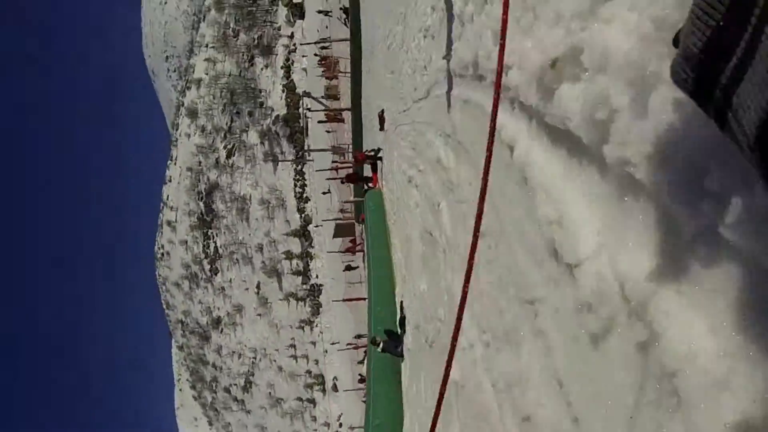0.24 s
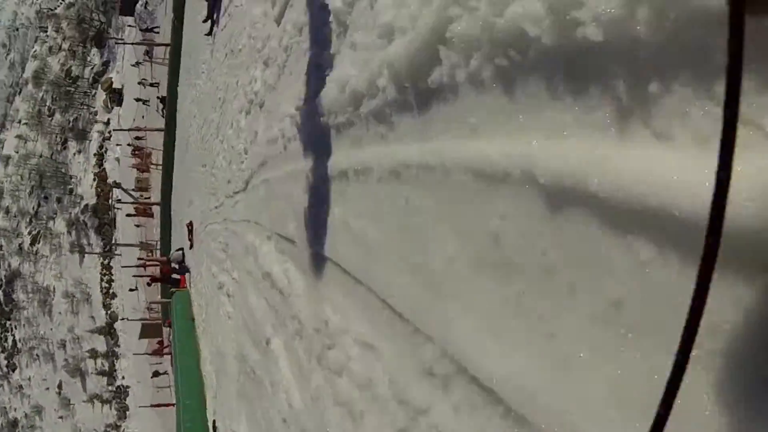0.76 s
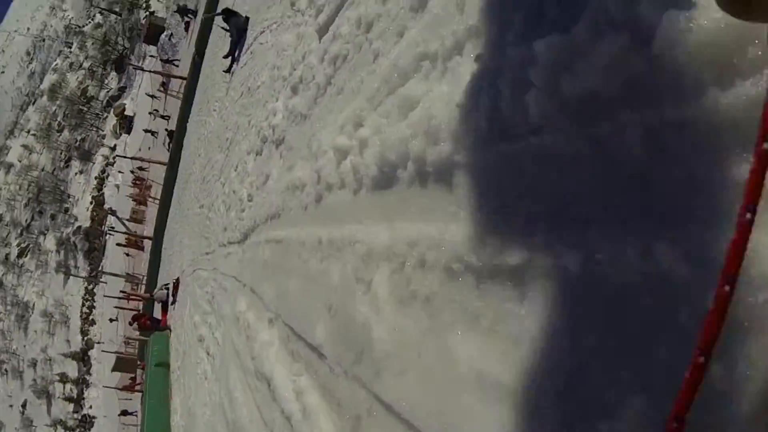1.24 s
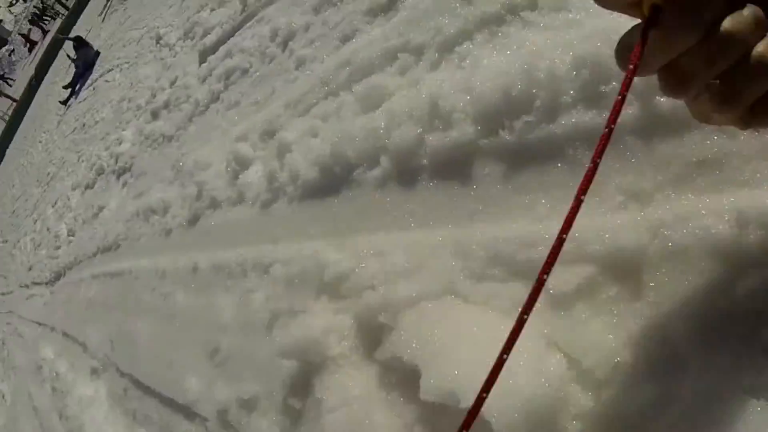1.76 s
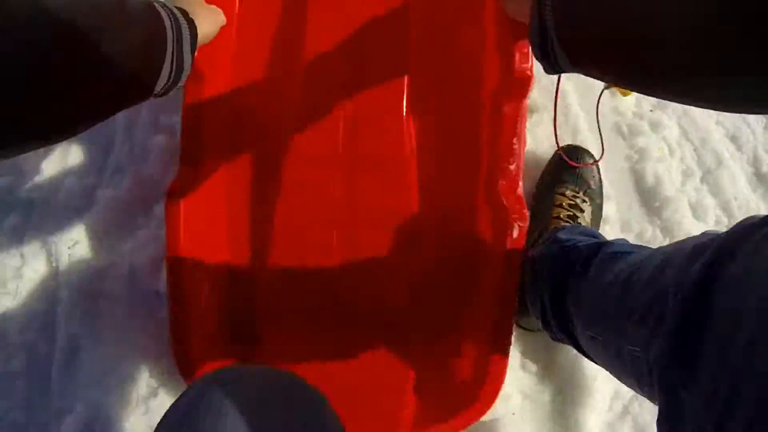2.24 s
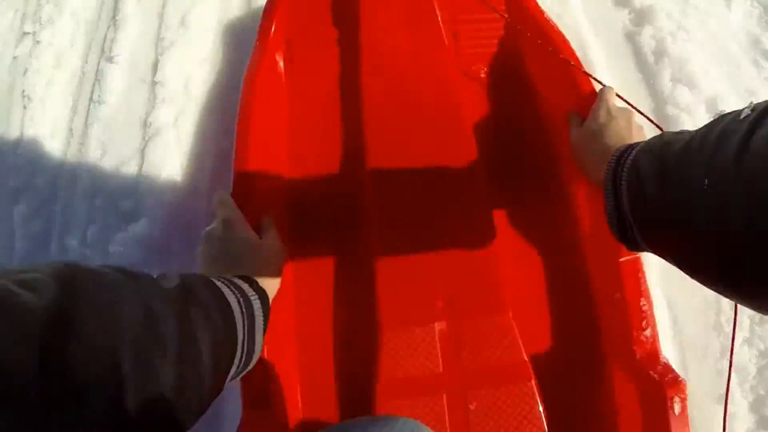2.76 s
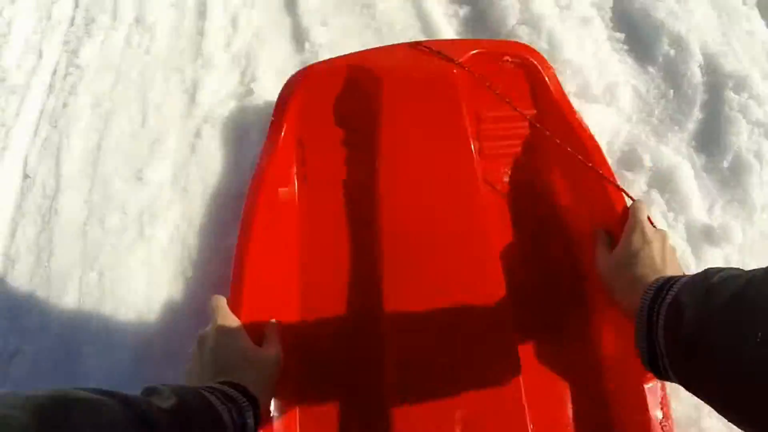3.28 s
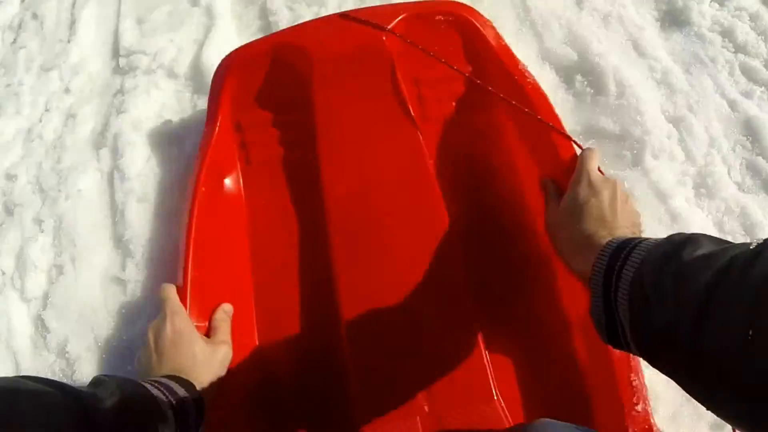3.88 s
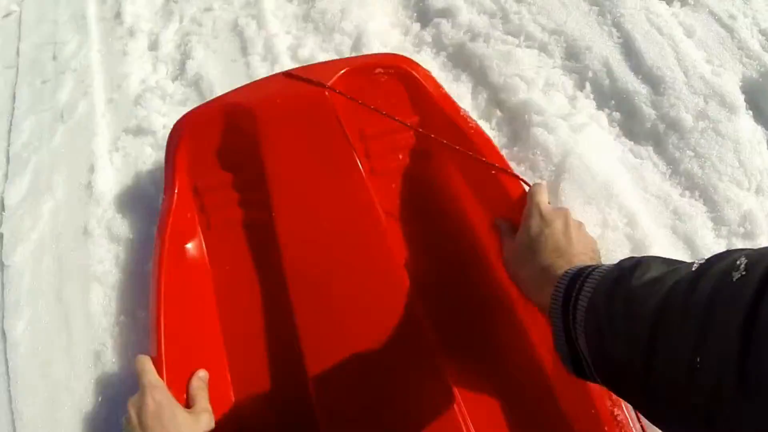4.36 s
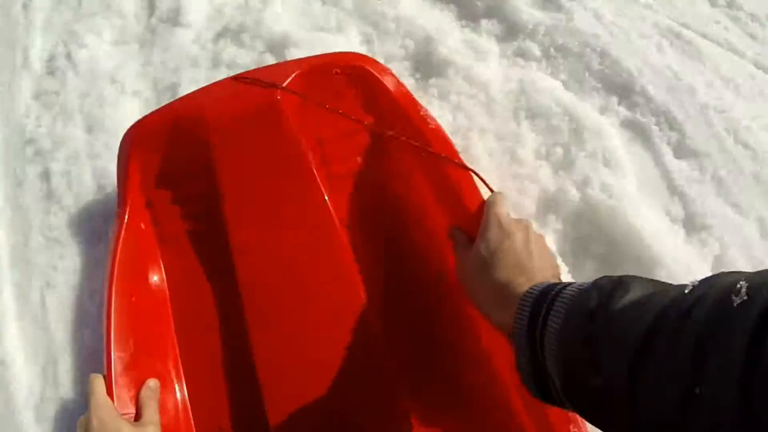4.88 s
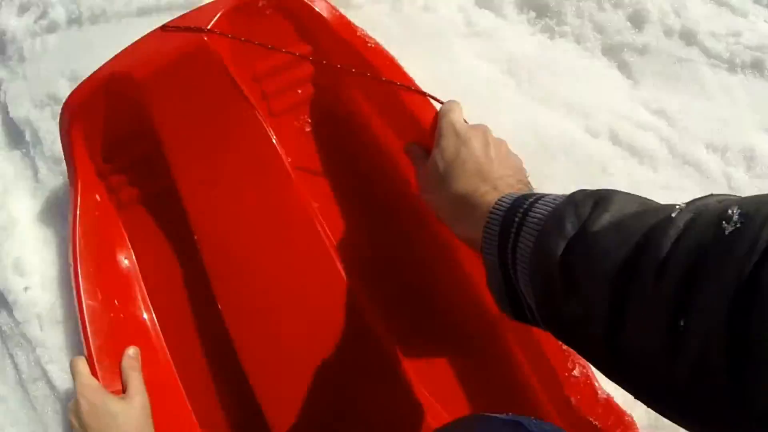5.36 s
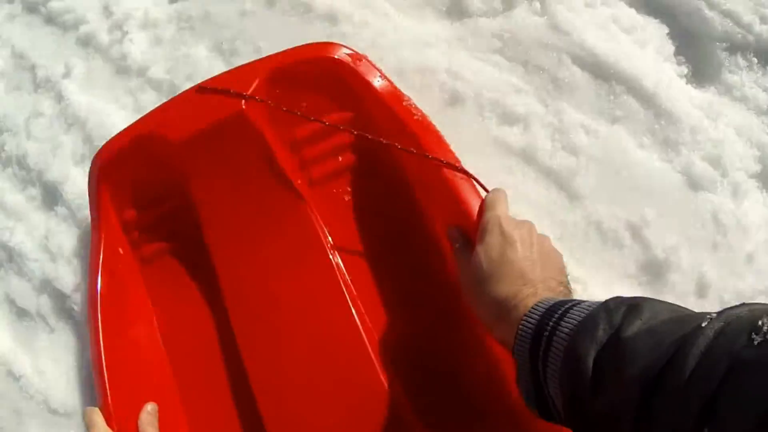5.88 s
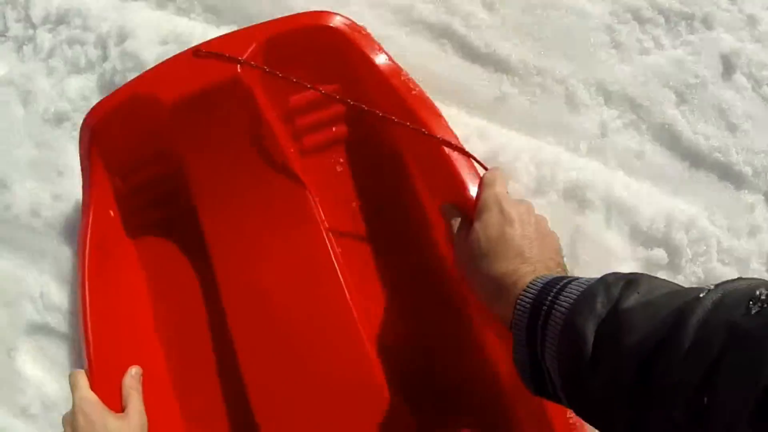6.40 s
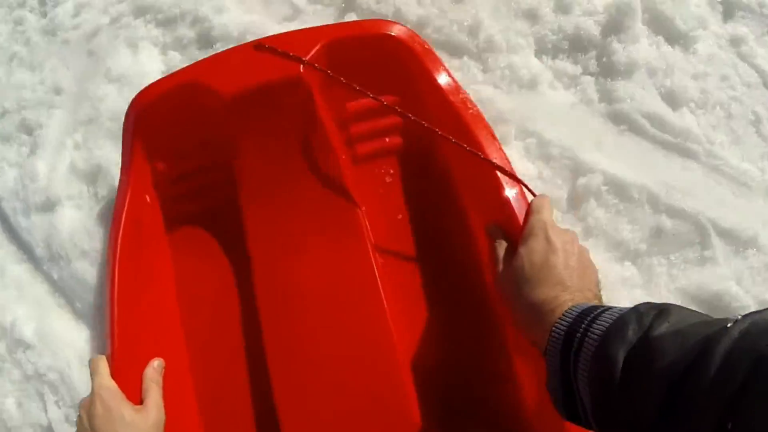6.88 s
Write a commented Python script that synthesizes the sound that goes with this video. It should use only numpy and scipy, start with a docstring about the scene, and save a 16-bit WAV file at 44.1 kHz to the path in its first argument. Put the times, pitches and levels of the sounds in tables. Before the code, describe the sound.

Close, boxy plastic cracks and short rough rubs crowd together over low wind thumps and snow hiss as a sled bumps downhill.

```python
"""A plastic sled runs down a snowy slope, heard by a small camera in a closed plastic housing.
It opens on scraping under a short burst of hiss; then come scattered, mostly hard knocks on a brighter shell.
At 2.33 s the camera turns, the shell dulls, and knocks and rough rubs crowd in until about 5.8 s, then thin out.
Knocks are decaying modes, scrapes are stick-slip taps through those modes, wind is filtered noise, bumps are
low swings. The loudest knocks overload the input, which falls silent briefly near 1.3, 2.3 and 3.3 s."""
import sys
import numpy as np
from scipy import signal
from scipy.fft import rfft, irfft, next_fast_len
from scipy.io import wavfile
from scipy.ndimage import uniform_filter1d

SR = 44100
rng = np.random.default_rng(int(sys.argv[2]) if len(sys.argv) > 2 else 0)


def bounce(signal):
    """Save signal as a 16-bit WAV file at the path given by the first command-line argument."""
    frames = np.transpose(np.atleast_2d(signal))
    limited = np.clip(frames, -1, 1)
    pcm = np.round(limited * 32767).astype(np.int16)
    wavfile.write(sys.argv[1], SR, pcm)


N = 314854
RING_SAMPLES = 4096


def undb(db):
    """Decibels to gain."""
    return 10 ** (np.asarray(db) / 20)


def unit(x):
    """Scale to rms 1."""
    return x / np.sqrt(np.mean(x ** 2))


def curve(table):
    """Columns of a table as sample-by-sample controls."""
    time_s, *columns = np.transpose(table)
    return [np.interp(np.arange(N) / SR, time_s, column) for column in columns]


def colour(x, points):
    """Filter by (frequency [Hz], gain [dB]) points, interpolated over log frequency."""
    size = next_fast_len(N)
    hz, db = np.transpose(points)
    bin_hz = np.arange(size // 2 + 1) * SR / size
    gain = undb(np.interp(np.log(bin_hz + 1), np.log(hz), db))
    return irfft(rfft(x, size) * gain, size)[:N]


def walk(rate_hz):
    """Random levels held 1 / rate_hz s and slewed twice."""
    hold = int(SR / rate_hz)
    steps = np.repeat(rng.standard_normal(N // hold + 1), hold)
    return uniform_filter1d(uniform_filter1d(steps, hold), hold)[:N]


# wind and snow past the port, before flutter: (time [s], thump level [dB], rush level [dB])
WIND_LEVELS = [(0, -37.5, -62.5), (.42, -30, -61.5), (.55, -20.5, -59.5), (.92, -24.5, -54.5),
               (1.05, -32.5, -61.5), (1.8, -41.5, -66), (2.38, -30.5, -56), (2.6, -27.5, -44.5),
               (2.84, -29.5, -55.5), (3.78, -41, -54), (4.2, -31.5, -53.5), (4.61, -36, -53.5),
               (5.89, -31.5, -52), (6.5, -21.5, -39.5), (6.7, -25.5, -50.5), (6.88, -28.5, -46.5),
               (7.14, -25.5, -43)]
# relative noise spectra: (frequency [Hz], density [dB per Hz])
THUMP_SPECTRUM = [(15, 3), (28, 3), (60, -11.5), (130, -26), (250, -46.5), (500, -86.5)]
RUSH_SPECTRUM = [(80, 0), (170, -1), (320, -1), (700, -8), (1200, -17), (2500, -54.5)]
HISS_SPECTRUM = [(1500, -2.5), (3000, -5.5), (6500, -8.5), (9000, -19.5), (11000, -18.5), (15000, -31)]
HISS_OVER_RUSH_DB = -5
BURST_DB, BURST_S = -42, 0.069  # extra hiss at the start


def wind():
    """Slow pressure swings thump on the port, snow rushes under the hull, spray hisses far above in pitch."""
    thump_db, rush_db = curve(WIND_LEVELS)
    t = np.arange(N) / SR
    burst = undb(BURST_DB) * np.clip(2 - 2 * t / BURST_S, 0, 1)
    hiss_gain = undb(rush_db + HISS_OVER_RUSH_DB) + burst
    thump = unit(colour(rng.standard_normal(N), THUMP_SPECTRUM)) * undb(2 * walk(16))
    rush = unit(colour(rng.standard_normal(N), RUSH_SPECTRUM)) * undb(4.6 * walk(25))
    hiss = unit(colour(rng.standard_normal(N), HISS_SPECTRUM)) * undb(4.0 * walk(25))
    return undb(thump_db) * thump + undb(rush_db) * rush + hiss_gain * hiss


# low bumps of the hull: (time [s], level before decay [dB], frequency [Hz])
HULL_BUMPS = [(2.09, -28, 90), (2.332, -29, 110), (2.531, -28, 100), (2.607, -21.5, 92), (6.844, -23, 98)]


def bumps():
    """The loaded hull flexes: one heavy swing that dies within a cycle or two."""
    t = np.arange(N) / SR
    out = np.zeros(N)
    for start_s, db, hz in HULL_BUMPS:
        age_s = np.maximum(t - start_s, 0)
        out += undb(db) * np.sin(2 * np.pi * hz * age_s) * np.exp(-age_s * hz)
    return out


def ring(modes, detune, scatter_db, count):
    """count responses of a mode group to a tap, peak 1; neighbouring modes start in opposite senses."""
    hz, db, t60_s = np.transpose(modes)[:, None, :, None]
    chance = rng.standard_normal((count, len(modes), 2))
    t = np.arange(RING_SAMPLES) / SR
    sense = (-1.) ** np.arange(len(modes))[:, None]
    mode_hz = hz * (1 + detune * chance[..., :1])
    waves = np.exp(-np.log(1000) * t / t60_s) * np.sin(2 * np.pi * mode_hz * t)
    mode_gain = undb(db + scatter_db * chance[..., 1:])
    out = (sense * mode_gain * waves).sum(axis=1)
    return out / abs(out).max(axis=1, keepdims=True)


def slips(rate_hz, spread_db, flurry_db):
    """Stick-slip taps of very uneven size over a fine grain; they come in quick flurries."""
    fall, size = rng.random((N, 2)).T
    taps = (fall < rate_hz / SR) * undb(-spread_db * np.log(1 - size)) * rng.standard_normal(N)
    grain = 0.74 * rng.standard_normal(N)
    flurries = (unit(taps) + grain) * undb(flurry_db * walk(110))
    # slips are softer than blows and lose the extreme treble
    return unit(colour(flurries, [(3000, -3.5), (12000, -10.5)]))


RUB_SWELL_DB = 11  # ends of a rub below its middle


def rub(start_s, end_s):
    """Envelope of one rub: quick edges and a swell in the middle."""
    t = np.arange(N) / SR
    place = np.clip((2 * t - start_s - end_s) / (end_s - start_s), -1, 1)
    gate = uniform_filter1d(1. * (abs(place) < 1), size=200)
    return gate * undb(-RUB_SWELL_DB * place ** 2)


# housing modes, also rung by knocks(): (frequency [Hz], relative level [dB], t60 [s])
DEEP_MODES = [(722, -7, 0.029), (997, 1.5, 0.013)]
LOW_MODES = [(1274.4, 2, 0.015), (1611, 3, 0.0084), (1429, -7, 0.016)]
MIDDLE_MODES = [(2143, 2.5, 0.014), (3100, -12.5, 0.023), (3346, -8, 0.017)]
HIGH_MODES = [(3625, 2.5, 0.011), (4106, -11.5, 0.028), (4614, 4, 0.016), (5760, -12, 0.012),
              (6730, -2.5, 0.0037), (10040, -47.5, 0.0027), (13000, -53.5, 0.0024)]
# until the camera is turned to face the sled the shell is held differently: middle modes sit higher
MIDDLE_MODES_BEFORE = [(2406, 4, 0.0049), (3060, 0.5, 0.0087), (3274, -1.5, 0.0072), (3840, -44.5, 0.17)]
TURN_S = 2.33
# steady sliding: (time [s], level [dB])
SLIDE_LEVELS = [(0, -40), (.15, -58.5), (.95, -55.5), (1.05, -63), (1.8, -68.5), (2.1, -62.5),
                (2.75, -45.5), (2.9, -55), (3.27, -48), (3.65, -57.5), (4.05, -54.5), (4.34, -47.5),
                (4.6, -57), (4.85, -49.5), (5.9, -50), (6.42, -38.5), (6.9, -46.5), (7.14, -36.5)]
# short rough rubs: (start [s], end [s], mid-rub level [dB], middle ring minus low [dB])
ROUGH_RUBS = [(0, 0.093, -37.5, -12.5), (0.999, 1.017, -30.5, -5.5), (1.872, 2.056, -34, -1.5),
              (2.225, 2.249, -39, -22), (2.573, 2.599, -32, -16), (2.692, 2.753, -32, -7),
              (3.083, 3.14, -27, -7.5), (3.202, 3.249, -31.5, -13.5), (3.267, 3.322, -38.5, -25),
              (3.722, 3.781, -28, -13.5), (3.837, 3.954, -40, -19), (4.083, 4.118, -35.5, -29),
              (4.207, 4.268, -26.5, -15), (4.296, 4.376, -37, -15), (4.5, 4.522, -25.5, -13),
              (4.762, 4.818, -35, -11), (4.98, 5.033, -29, -15), (5.119, 5.172, -24.5, -15),
              (5.306, 5.332, -35.5, -26), (5.545, 5.584, -29.5, -17.5), (5.721, 5.788, -28.5, -15.5),
              (6.039, 6.083, -30.5, -22)]
# steady sliding, drive of middle and high rings relative to low
BRIGHT_BEFORE_DB, BRIGHT_AFTER_DB = -7.5, -12


def scrape():
    """Steady sliding and short rubs ring the same shell as the knocks."""
    slide_db, = curve(SLIDE_LEVELS)
    t = np.arange(N) / SR
    before = t < TURN_S
    bright_db = np.where(before, BRIGHT_BEFORE_DB, BRIGHT_AFTER_DB)
    steady = slips(2500, spread_db=2.5, flurry_db=3)
    rough = slips(2200, spread_db=2.5, flurry_db=4.5)
    rub_push, rub_bright = np.zeros(N), np.zeros(N)
    for start_s, end_s, db, hard_db in ROUGH_RUBS:
        envelope = rub(start_s, end_s)
        rub_push += envelope * undb(db)
        rub_bright += envelope * undb(db + hard_db)
    push = undb(slide_db) * steady + rough * rub_push
    bright = undb(slide_db + bright_db) * steady + rough * rub_bright

    def through(force, modes):
        """A force heard through one mode group, response scaled to unit energy."""
        shape = ring(modes, detune=0, scatter_db=0, count=1)[0]
        return signal.fftconvolve(force, shape / np.linalg.norm(shape))[:N]

    middle = np.where(before, through(bright, MIDDLE_MODES_BEFORE), through(bright, MIDDLE_MODES))
    low = through(push, LOW_MODES) + undb(-17.5) * through(push, DEEP_MODES)
    return low - middle - undb(-11) * through(bright, HIGH_MODES)


RATTLE_PER_S = 35  # count rounded up in each rub
RATTLE_OVER_RUB_DB, RATTLE_SPREAD_DB = 9, 4  # spread is plus or minus


def rattle():
    """Light knocks at random times within each rub, as rows like BLOWS."""
    rows = []
    for start_s, end_s, db, hard_db in ROUGH_RUBS:
        length_s = end_s - start_s
        when, size = rng.random((int(np.ceil(RATTLE_PER_S * length_s)), 2)).T
        level_db = db + RATTLE_OVER_RUB_DB + RATTLE_SPREAD_DB * (2 * size - 1)
        rows += zip(start_s + when * length_s, level_db, hard_db + 0 * size)
    return rows


# blows: (time [s], low ring peak before contact shaping [dB], hardness as middle ring minus low [dB])
BLOWS = [(0.049, -24, 3), (0.0897, -39.5, 20), (0.583, -16.5, -22), (0.984, -2, 2.5), (1.1501, 0.5, 2),
         (1.3994, -34, -28.5), (1.4951, -0.5, 3), (1.6682, -2, 4.5), (1.7884, -18, 11), (1.8012, -23.5, 6),
         (1.8515, -25, 6), (1.8618, -25.5, 5), (1.921, -19, 7.5), (2.092, -36, -5), (2.111, -33, -14),
         (2.1635, -22.5, -11), (2.1752, -13.5, 5.5), (2.319, -27.5, -11), (2.3301, -24, -11),
         (2.5213, -5.5, -3.5), (2.558, -1.5, -13), (2.6182, 4.5, -15), (2.65, -1, -15.5),
         (2.7018, -12, -0.5), (2.712, -10, -1), (2.7236, -8.5, -8), (2.757, -10.5, -15),
         (2.7617, -6.5, -3.5), (2.776, -11, -17), (2.858, 0, -2), (2.9276, -3.5, -2.5), (2.944, -16.5, -9),
         (3.0905, -17, -17), (3.102, -13, -5), (3.118, -16.5, 1), (3.1308, -7.5, -21), (3.1457, -19.5, -14),
         (3.2, -3, -2.5), (3.2089, -10, -17), (3.378, -4, -4), (3.3829, -8.5, -8), (3.3876, -8, -1.5),
         (3.4038, -7.5, -4), (3.4342, -5, -7.5), (3.4621, -3.5, -3.5), (3.4875, -18.5, -11),
         (3.53, -3, -2.5), (3.5374, -7, -3.5), (3.706, -11.5, -5.5), (3.7323, -2, -9), (3.7689, -12, -6.5),
         (3.772, -13, -26), (3.7933, -15, -12.5), (3.803, -18, -15), (3.8465, -17.5, -9.5),
         (3.858, -16.5, -14), (3.89, -17.5, -20), (3.9462, -12.5, -13), (4.0897, -16, -17),
         (4.137, -12.5, -7), (4.1599, -11, -16), (4.1653, -11, 7.5), (4.184, -5, -10), (4.198, -17, -17),
         (4.2154, -4.5, -8.5), (4.2211, -5, -8.5), (4.2353, -9, -11.5), (4.2464, -14, -13),
         (4.2894, -3, -5.5), (4.31, -13, -7.5), (4.322, -9, -14), (4.348, -13.5, -6.5),
         (4.3645, -9.5, -11.5), (4.4586, -19, -11), (4.5014, -1, -9.5), (4.5531, -7.5, -1.5),
         (4.5697, -4, -4), (4.6371, -4.5, -2.5), (4.744, -21, -15), (4.78, -14, -5), (4.7993, -4, -8.5),
         (4.8112, -8.5, -11), (4.8486, -8.5, -14.5), (4.857, -12.5, -18), (4.903, -23, -4),
         (4.9333, -13, 4), (4.952, -2.5, -7), (4.9572, -3, -10), (4.981, -8, -9.5), (4.9916, -4, -10.5),
         (5.02, -11.5, -13.5), (5.0265, -9.5, -16), (5.056, -12, -7), (5.0842, -11.5, -3.5),
         (5.1051, -16, -8), (5.12, -18, -14), (5.126, -15, -10), (5.137, -15, -7), (5.145, -12.5, -5.5),
         (5.1844, -11.5, -17), (5.209, -23, -21), (5.3554, -3.5, -7), (5.5184, -10, -10), (5.525, -14, -16),
         (5.5467, -14.5, -20), (5.5533, -13, -27), (5.5808, -7, -7.5), (5.6142, -16.5, -14),
         (5.6381, -11.5, -8.5), (5.649, -11.5, -15), (5.657, -20, -15), (5.678, -3.5, -11.5),
         (5.7235, -15, -1.5), (5.736, -6, -8), (5.7427, -11, -16), (5.7571, -8.5, -17.5), (5.779, -8, -18),
         (5.9875, -11.5, -11), (6.135, -21, -22), (6.5957, -1.5, -6.5), (6.6103, -13, -33),
         (6.6298, -15, -13.5), (6.715, -19.5, -25), (6.739, -13.5, -21), (6.8002, -4, -12.5),
         (6.8066, -5, -21), (6.8399, -19.5, -11), (6.936, -21.5, -12), (7.002, -22, -12),
         (7.1021, -17, -15)]


def knocks():
    """Each blow rings the mode groups, gives a dull thud and crack, and leaves a short rattle."""
    start_s, db, hard_db = np.transpose(BLOWS + rattle())[:, :, None]
    count, t, before = len(start_s), np.arange(RING_SAMPLES) / SR, start_s < TURN_S
    low = ring(LOW_MODES, detune=.02, scatter_db=1.5, count=count)
    middle_before = ring(MIDDLE_MODES_BEFORE, detune=.006, scatter_db=2.5, count=count)
    middle_after = ring(MIDDLE_MODES, detune=.04, scatter_db=4, count=count)
    middle = np.where(before, middle_before, middle_after)
    high = ring(HIGH_MODES, detune=.03, scatter_db=4, count=count)
    deep = ring(DEEP_MODES, detune=0, scatter_db=0, count=count)
    # harder contact is shorter, so the high modes gain faster than the middle ones
    high_db = 1.29 * hard_db + np.where(before, -13, -4.0)
    # soft blows on the shell as first held reach its deepest modes
    deep_db = np.where(before, -17.0 - 0.64 * hard_db, -20)
    body = low + undb(deep_db) * deep - undb(hard_db) * middle - undb(high_db) * high
    thud = -undb(np.where(before, -14, -22)) * np.sin(2 * np.pi * 230 * t) * np.exp(-t / 0.0017)
    # surfaces crack apart: a brief unpitched burst, different every time
    burst = np.diff(rng.standard_normal((count, len(t) + 1))) * np.exp(-t / 0.0003)
    crack_band = signal.butter(2, (1800, 7000), "band", fs=SR, output="sos")
    crack = signal.sosfilt(crack_band, burst * undb(high_db - 21.5))
    # loose parts chatter on for a few hundredths of a second
    chatter = rng.standard_normal((count, len(t))) * np.exp(-t / 0.0055) * undb(-32)
    chatter_ring = signal.fftconvolve(chatter, body, axes=1)[:, :len(t)]
    # force builds over the contact time, longer for soft blows
    contact_s = 0.00018 * undb(-.5 * hard_db)
    contact = 1 - np.exp(-(t / contact_s) ** 2)
    sound = undb(db) * contact * (body + thud + crack + chatter_ring)
    out = np.zeros(N + len(t))
    np.add.at(out, (start_s * SR).astype(int) + np.arange(len(t)), sound)
    return out[:N]


# right channel relative to left: (frequency [Hz], gain [dB])
RIGHT_RESPONSE = [(100, 0), (300, .4), (600, .8), (1200, .8), (2500, 1.3), (5000, 1.2), (9000, .5),
                  (13000, -.4)]


def scene():
    """One port feeds both channels; the right is a little louder in the middle and differs faintly."""
    shell = knocks() + scrape()
    port = shell + bumps() + wind()
    # late, differentiated shell sound, opposite in the two channels, drifting at random
    apart = undb(-29) * np.diff(np.roll(shell, 9), prepend=0) * unit(walk(30))
    return np.array([port + apart, colour(port, RIGHT_RESPONSE) - apart]) * undb(-.4)


# brief silences: (start [s], start of fade back in [s])
SILENCES = [(1.3229, 1.3335), (2.3229, 2.3295), (3.3229, 3.334)]
FADE_S, TOP_HZ = .002, 15400


def record(dry):
    """The input saturates at full scale, falls silent for a moment three times, and the top is cut."""
    saturated = dry / (1 + abs(dry) ** 6.0) ** (1 / 6.0)
    t = np.arange(N) / SR
    silent = sum((t > start_s) * np.clip((end_s - t) / FADE_S + 1, 0, 1) for start_s, end_s in SILENCES)
    top_cut = signal.ellip(8, .2, 70, TOP_HZ, fs=SR, output="sos")
    return signal.sosfilt(top_cut, saturated * (1 - silent))


dry = scene()
out = record(dry)
bounce(out)
```